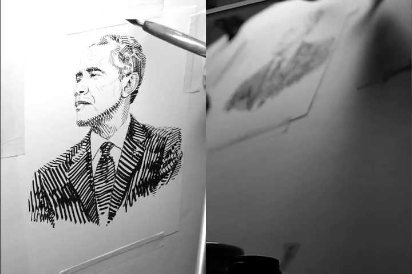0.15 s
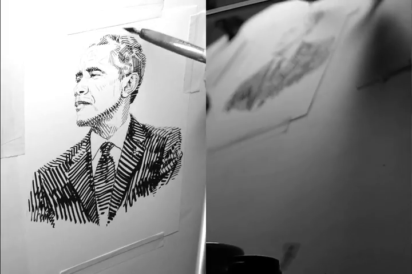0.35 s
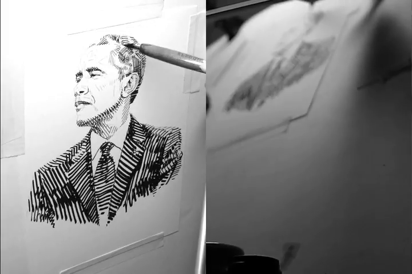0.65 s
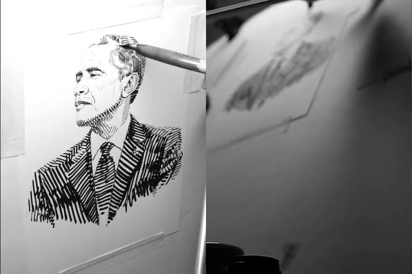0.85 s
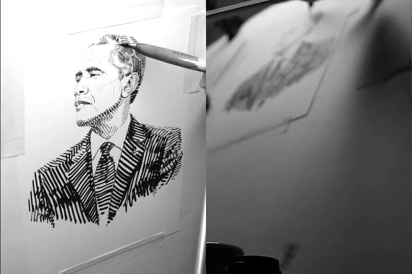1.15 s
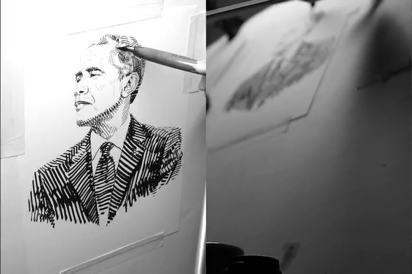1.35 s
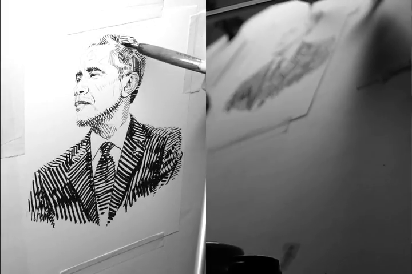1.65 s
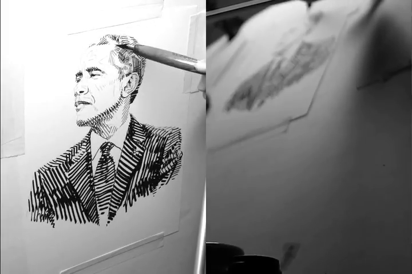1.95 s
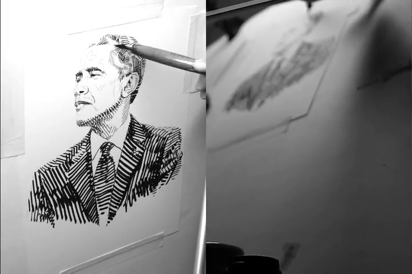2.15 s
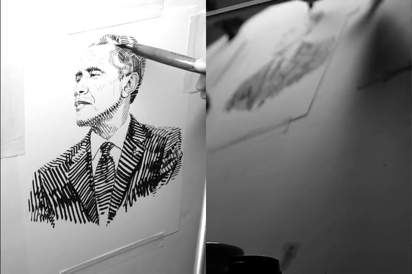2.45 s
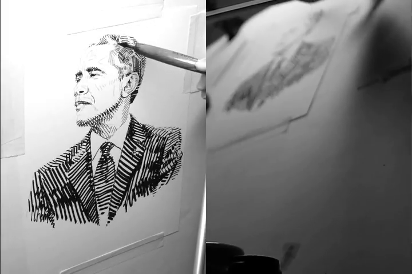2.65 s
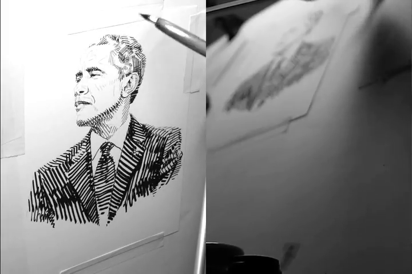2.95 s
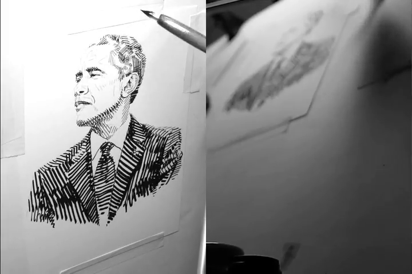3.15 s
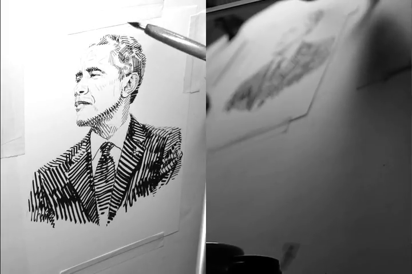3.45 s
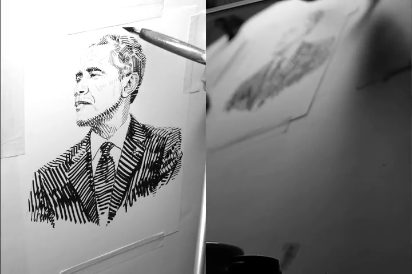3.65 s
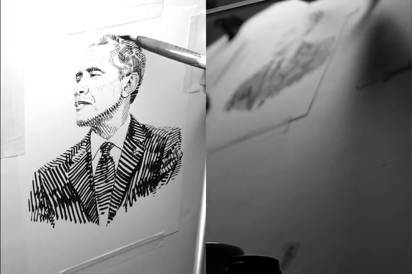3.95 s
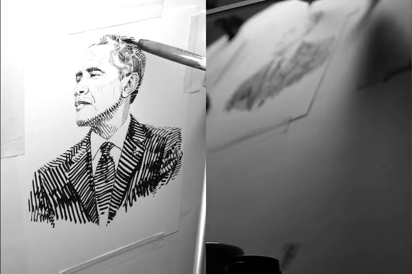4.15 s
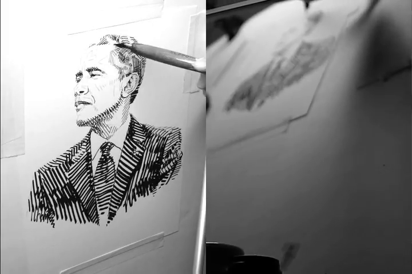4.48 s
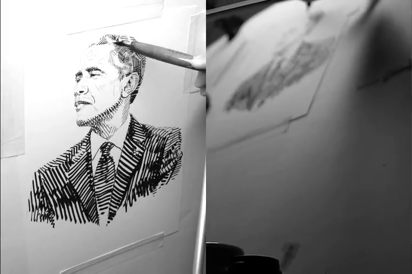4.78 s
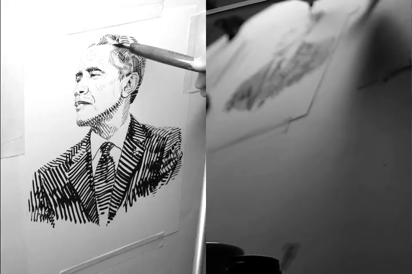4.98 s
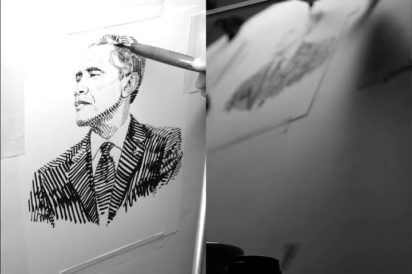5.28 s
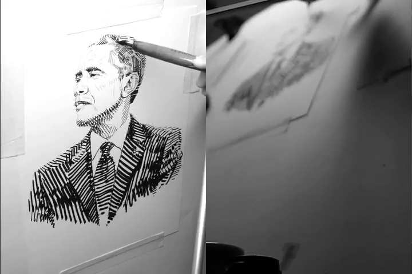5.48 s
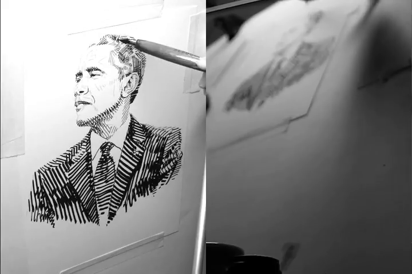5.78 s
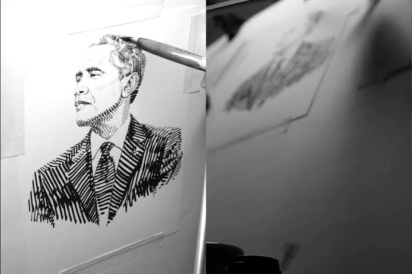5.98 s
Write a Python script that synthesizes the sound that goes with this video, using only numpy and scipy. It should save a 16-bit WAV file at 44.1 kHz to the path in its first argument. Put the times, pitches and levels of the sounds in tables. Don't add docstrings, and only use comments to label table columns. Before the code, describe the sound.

Close, dry pen strokes rasp across paper on a resonant drawing board, each landing with a small knock, between pauses over faint traffic and hiss.

```python
import sys
import numpy as np
from scipy import signal
from scipy.fft import rfft, irfft, next_fast_len
from scipy.io import wavfile
from scipy.ndimage import uniform_filter1d, map_coordinates

SR = 44100
rng = np.random.default_rng(int(sys.argv[2]) if len(sys.argv) > 2 else 0)


def decibels_to_gain(level_db):
    exponent = np.asarray(level_db, float) / 20
    return 10 ** exponent


def wav_record(signal):
    frames = np.transpose(np.atleast_2d(signal))
    bounded = np.clip(frames, -1, 1)
    quanta = np.round(bounded * 32767).astype(np.int16)
    wavfile.write(sys.argv[1], SR, quanta)


N = 269892

# (frequency [Hz], width [Hz], level [dB])
BOARD_MODES = [(147, 15, -16.5), (195.1, 10, 4), (226.5, 15.3, 5.5), (252.5, 11, 1.5), (287.8, 6.3, 1),
               (319, 13, -11)]
# (frequency [Hz], width [Hz], level [dB])
EDGE_MODES = [(319, 7.9, 7), (354.5, 9.7, 2.5), (368, 5.6, 7.5)]
# (frequency [Hz], width [Hz], level [dB])
SHEET_MODES = [(452, 12.3, 5), (535.6, 57, 8.5), (610, 53, 8.5), (702, 81, 3.5), (883, 130, -3)]
# (frequency [Hz], width [Hz], level [dB])
CRISP_MODES = [(1022, 110, -9.5), (1402, 310, -11.5), (1850, 210, -20.5)]
# (frequency [Hz], width [Hz], level [dB])
NIB_MODES = [(2015, 230, 2), (2330, 340, 1), (3360, 390, -0.5), (4060, 480, -1), (4480, 930, -4.5),
             (5770, 460, -3.5), (6500, 540, -3.5), (7420, 1670, -13.5), (9700, 490, -14),
             (11300, 840, -20.5), (14900, 2200, -18.5)]
# (frequency [Hz], width [Hz], level [dB])
STAND_MODES = [(72.4, 10, -3), (126, 9.8, -17)]


def hand():
    # (start [s], length [s], share of the length where fastest [1], pressure [dB], top speed [dB])
    stroke_table = [
        (1.047, 0.046, 0.42, -42.5, 5),
        (1.057, 0.13, 0.55, -29, -0.5),
        (1.362, 0.097, 0.42, -31, 3),
        (2.263, 0.11, 0.22, -37, -1),
        (2.505, 0.093, 0.27, -40.5, -1.5),
        (4.665, 0.16, 0.4, -32.5, 3),
        (5.003, 0.12, 0.49, -32, 5),
        (5.295, 0.14, 0.45, -33, 1.5),
    ]
    sway_levels = [2, 4, 5, 9, 9.5, -1, 3.5, 11]
    layer_levels = [-0.5, -10, -24.5, -12]
    speed_powers = [0.48, 1.16, 1.58, 0.64]
    lift_s = 0.0079
    t = np.arange(N) / SR
    gains, fast = np.zeros((4, N)), np.zeros(N)
    powers = np.array(speed_powers)[:, None]
    for (s, length, fastest, pressure_db, top_db), sway_db in zip(stroke_table, sway_levels):
        end = s + length
        peak = s + np.clip(fastest, .1, .9) * length
        way = np.interp(t, [s, peak, end], [0, .5, .93])
        speed = (np.sin(np.pi * way).clip(0) + 1 - np.abs(2 * way - 1)) / 2
        fast = np.maximum(fast, speed * (t < end))
        level_db = pressure_db + np.array([[0], [0.38 * top_db], [top_db], [sway_db]])
        contact = (t > s) * np.clip((end - t) / lift_s, 0, 1)
        gains += decibels_to_gain(level_db) * speed ** powers * contact
    return gains * decibels_to_gain(np.array(layer_levels))[:, None], fast


def board_drag(gain):
    drag = resonate(rng.standard_normal(N), [(272, 395, 0)])
    drag /= np.abs(uniform_filter1d(drag ** 2, size=SR // 100)) ** 0.9
    force = gain * decibels_to_gain(-18.5) * drag / drag.std()
    board = resonate(force, BOARD_MODES, in_step=True)
    board += decibels_to_gain(-23.5) * resonate(force, EDGE_MODES, in_step=True)
    return filtered(board, lambda hz: dull(hz, corner_hz=352))


def sheet_grit(grit_gain, scratch_gain, fast, lumps):
    grit = decibels_to_gain(lumps) * fibres(6000, spread_db=1.46)
    sheet = resonate(grit_gain * decibels_to_gain(0.06) * grit, SHEET_MODES)
    crisp_gain = np.sqrt(grit_gain * scratch_gain) * fast ** 0.46 * decibels_to_gain(-2.5)
    return sheet + resonate(crisp_gain * grit, CRISP_MODES)


def nib_scratch(gain, lumps):
    roughness_db = -2.46 + lumps + 3.6 * wobble(250)
    return resonate(gain * decibels_to_gain(roughness_db) * fibres(12000, spread_db=0.7), NIB_MODES)


def stand_sway(gain):
    t = np.arange(N) / SR
    lag_s = .015
    sway = np.interp(t - lag_s, t, gain) * decibels_to_gain(-13) * rng.standard_normal(N)
    arm = decibels_to_gain(-2) * resonate(sway, [(35, 30, 0)])
    return resonate(sway, STAND_MODES) + arm


def strokes():
    (drag, grit, scratch, sway), fast = hand()
    lumps = wobble(90)
    pen = board_drag(drag) + sheet_grit(grit, scratch, fast, lumps)
    return pen + nib_scratch(scratch, lumps) + stand_sway(sway)


def steel(tick):
    ring = resonate(tick, NIB_MODES)
    return decibels_to_gain(5.5) * filtered(ring, lambda hz: dull(hz, corner_hz=9000))


def impacts(contacts, snap_speed):
    push, edge_push, thud, snap, tick = np.zeros((5, N))
    for s, db, tick_db, snap_db, edge_db, thud_db, ms in contacts:
        shape = np.hanning(max(int(ms * SR / 1000), 3))
        start = round((s - .0015) * SR)
        unit_push = shape / shape.sum()
        span = slice(start, start + len(shape))
        push[span] += decibels_to_gain(db) * unit_push
        edge_push[span] += decibels_to_gain(db + edge_db) * unit_push
        thud[span] += decibels_to_gain(db + thud_db) * unit_push
        quick = shape[::snap_speed]
        snap[start:start + len(quick)] += decibels_to_gain(db + snap_db) * quick / quick.sum()
        tick[round(s * SR)] += decibels_to_gain(db + tick_db)
    boom = decibels_to_gain(19.0) * resonate(push, BOARD_MODES, in_step=True)
    boom += decibels_to_gain(20) * resonate(edge_push, EDGE_MODES, in_step=True)
    knock = filtered(boom, lambda hz: dull(hz, corner_hz=330) ** 2)
    knock += decibels_to_gain(14.5) * resonate(snap, SHEET_MODES + CRISP_MODES, in_step=True)
    return filtered(knock, bending) + steel(tick) + decibels_to_gain(5) * resonate(thud, STAND_MODES)


def bending(hz):
    delay = np.exp(-4j * np.pi * 0.002197 * np.sqrt(250 * hz))
    return delay * (1j * hz / (1j * hz + 130)) ** 2


def taps():
    # (time [s], peak [dB], steel tick re peak [dB], paper snap re peak [dB], contact time [ms])
    tap_table = [(1.001, -42, -13, 0.5, 1.6), (1.063, -34, -25, 8.5, 2.5), (1.221, -41, -27, -25, 0.86),
                 (1.352, -24.5, -23, -4, 1.82), (1.499, -40, -30, -2, 1.5), (2.259, -26, -24, -0.5, 2),
                 (2.385, -42, -27, -18, 1.5), (2.5, -22.5, -21, -6.5, 1.6), (2.589, -41.5, -24, 3, 1.4),
                 (4.661, -31, -26, -4, 1.74), (4.814, -56, -32, -12, 2), (4.991, -23.5, -24, -6.5, 1.5),
                 (5.122, -51, -30, -20, 2.3), (5.155, -47, -32, -14, 1.7), (5.291, -25, -25, -4.5, 1.56),
                 (5.471, -49, -30, -15, 1.4)]
    edge_db, thud_db = -26, 0
    contacts = [(s, db, tick_db, snap_db, edge_db, thud_db, ms) for s, db, tick_db, snap_db, ms in tap_table]
    return impacts(contacts, snap_speed=2)


def bumps():
    # (time [s], peak [dB], edge ring re peak [dB], contact time [ms])
    bump_table = [
        (0.012, -28, -6, 0.49),
        (0.816, -52, 10, 1.3),
        (3.521, -21, -8, 1.1),
        (4.928, -51, 7, 0.89),
    ]
    tick_db, snap_db, thud_db = -29, -17.5, -8.5
    contacts = [(s, db, tick_db, snap_db, edge_db, thud_db, ms) for s, db, edge_db, ms in bump_table]
    return impacts(contacts, snap_speed=1)


def catches():
    # (time [s], peak [dB])
    catch_table = [
        (1.1129, -47),
        (1.1513, -51),
        (1.4085, -41.5),
        (2.2932, -56),
        (2.5694, -56),
        (4.7172, -46),
        (4.7324, -42),
        (5.3622, -38.5),
        (5.375, -43),
        (5.3866, -42.5),
    ]
    tick = np.zeros(N)
    tear = np.hanning(SR // 300)
    for s, db in catch_table:
        start = round(s * SR)
        tick[start:start + len(tear)] += decibels_to_gain(db - 10.5) * tear * rng.standard_normal(len(tear))
    return steel(tick)


def room(x):
    t = np.arange(SR // 2) / SR
    decay_s, first_echo_s = 0.13, .006
    tail = rng.standard_normal(len(t)) * decibels_to_gain(-60 * t / decay_s) * (t > first_echo_s)
    return signal.fftconvolve(x, tail / np.linalg.norm(tail))[:N]


def traffic():
    # (time [s], level [dB])
    roar_levels = [
        (0, -60.5),
        (.8, -63),
        (1.4, -63),
        (1.9, -67.5),
        (3.2, -69),
        (5, -71.5),
        (6.12, -72),
    ]
    # (frequency [Hz], density [dB per Hz])
    tyre_spectrum = [(250, -59), (400, 0.5), (600, -3.5), (900, 2), (1800, -8), (2500, -29.5),
                     (3500, -26.5), (6000, -54)]
    # (frequency [Hz], density [dB per Hz])
    rumble_spectrum = [(15, -21), (32, 7), (120, -5.5), (200, -1.5), (290, -8), (350, -5), (420, -18.5),
                       (800, -42)]
    t = np.arange(N) / SR
    roar_db = np.interp(t, *np.transpose(roar_levels))
    roar = decibels_to_gain(roar_db + 1.5 * wobble(7.8)) * noise(tyre_spectrum)
    closest_s, pass_s = 2.17, 0.42
    near = decibels_to_gain(-75) + decibels_to_gain(-66.5) / (1 + ((t - closest_s) / pass_s) ** 2)
    engine = near * noise([(60, -33), (85, -7.5), (97, 5.5), (110, -22.5), (150, -48)])
    rumble_db = -65.5 + 1.4 * (roar_db - roar_db.mean()) + 1.8 * wobble(3.6)
    return roar + engine + decibels_to_gain(rumble_db) * noise(rumble_spectrum)


def hum():
    harmonic_levels = [-60, -75, -74, -76, -74, -83, -91, -123, -87.5, -90.5, -96.5, -137, -82]
    mains_hz = 50
    turn = 2 * np.pi * mains_hz * np.arange(N) / SR
    total = np.zeros(N)
    for k, db in enumerate(harmonic_levels, 1):
        level = np.sqrt(2) * decibels_to_gain(db + 2.4 * wobble(13))
        total += level * np.sin(k * turn + 2 * np.pi * rng.random())
    return total


def hiss():
    # (frequency [Hz], density [dB per Hz])
    hiss_spectrum = [(1470, 4.5), (2500, 1), (3010, -1.5), (3220, -3), (14700, -5), (15600, -4.5)]
    return decibels_to_gain(-68) * noise(hiss_spectrum)


def along(points, hz):
    f, v = np.transpose(points)
    return np.interp(np.log(hz + 1), np.log(f + 1), v)


def filtered(x, response):
    m = next_fast_len(N + SR // 2)
    return irfft(rfft(x, m) * response(np.fft.rfftfreq(m, 1 / SR)), m)[:N]


def resonate(x, modes, in_step=False):
    flip = 1 if in_step else -1

    def body(f):
        return sum(flip ** k * decibels_to_gain(db) * 1j * f * w / (c * c - f * f + 1j * f * w)
                   for k, (c, w, db) in enumerate(modes))

    power = np.mean(np.abs(body(np.arange(SR // 2))) ** 2)
    return filtered(x, body) / np.sqrt(power)


def dull(hz, corner_hz):
    return 1 / (1 - (hz / corner_hz) ** 2 + 1j * hz / corner_hz)


def wobble(rate):
    knots = rng.standard_normal(int(N * rate / SR) + 4)
    return map_coordinates(knots, [np.arange(N) * rate / SR])


def noise(spectrum):
    x = filtered(rng.standard_normal(N), lambda hz: decibels_to_gain(along(spectrum, hz)))
    return x / x.std()


def fibres(per_s, spread_db):
    hit = rng.random(N) < per_s / SR
    slips = hit * rng.standard_normal(N) * decibels_to_gain(spread_db * rng.exponential(size=N))
    return slips / slips.std()


def scene():
    pen = strokes() + taps() + bumps() + catches()
    return (pen + decibels_to_gain(-15.0) * room(pen) + traffic())[None]


def low_pass(x):
    return signal.sosfilt(signal.butter(12, 15770, fs=SR, output="sos"), x)


def record(dry):
    mix = dry + hum() + hiss()
    return low_pass(mix)


dry = scene()
out = record(dry)
wav_record(out)
```